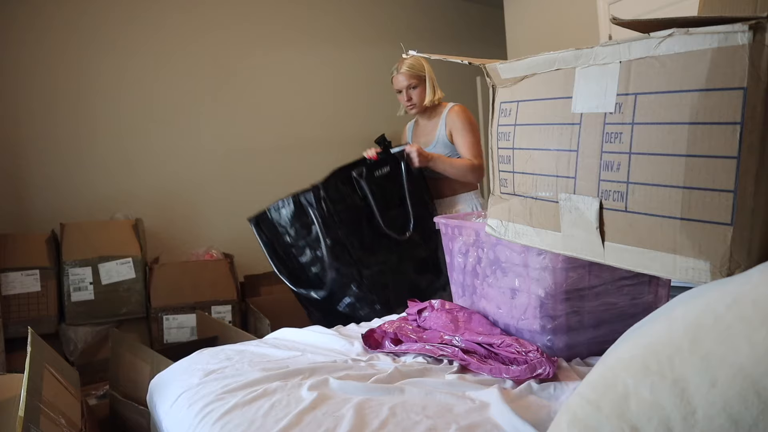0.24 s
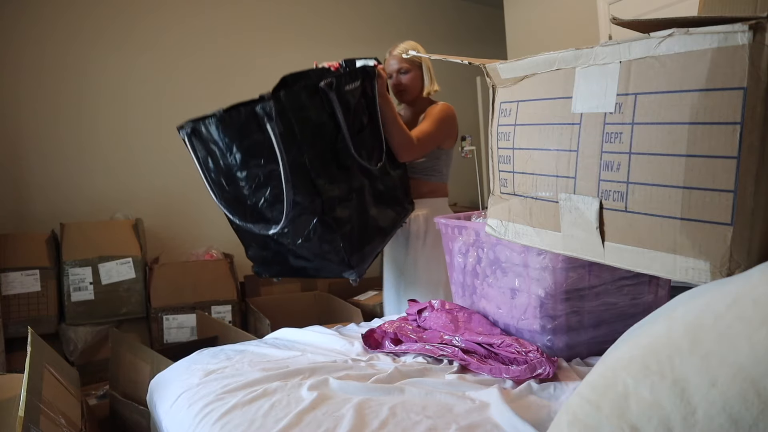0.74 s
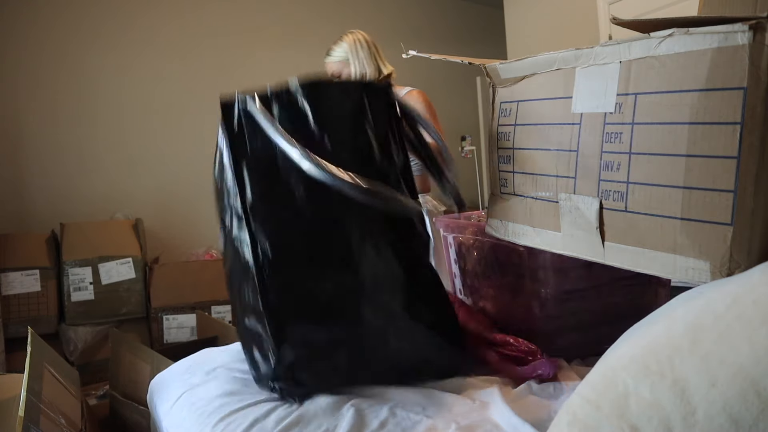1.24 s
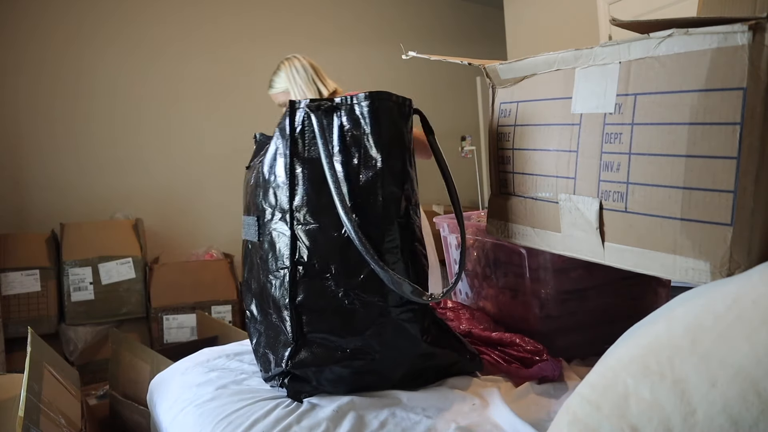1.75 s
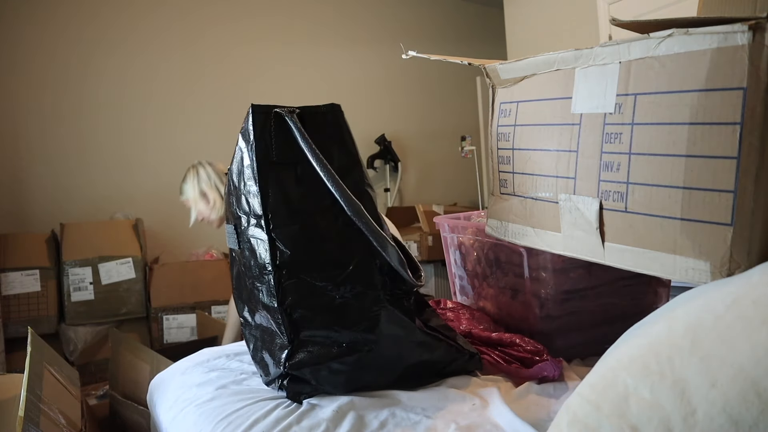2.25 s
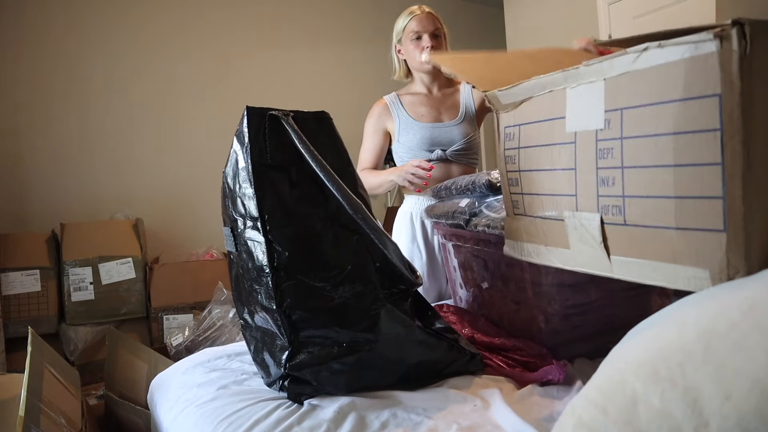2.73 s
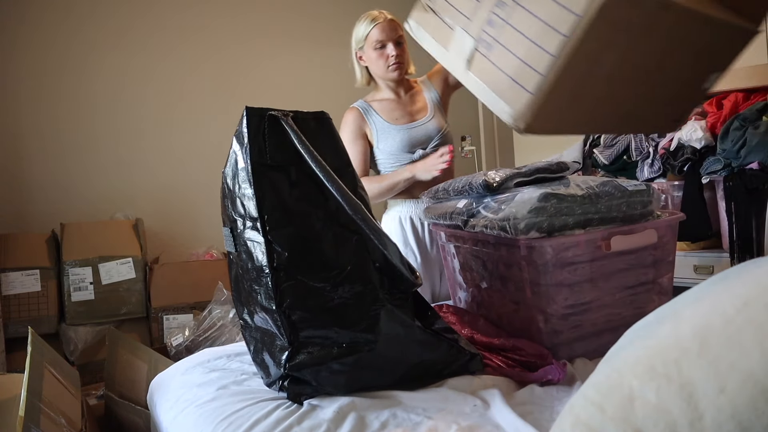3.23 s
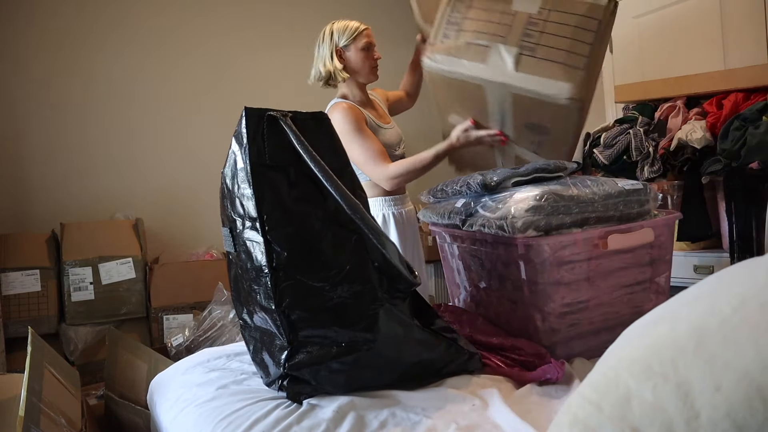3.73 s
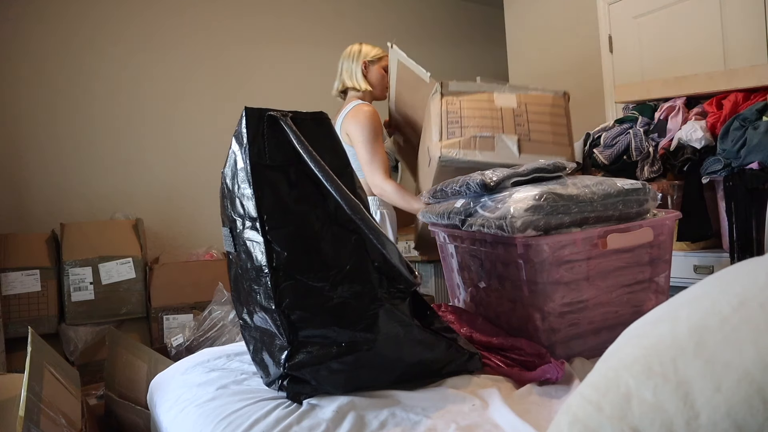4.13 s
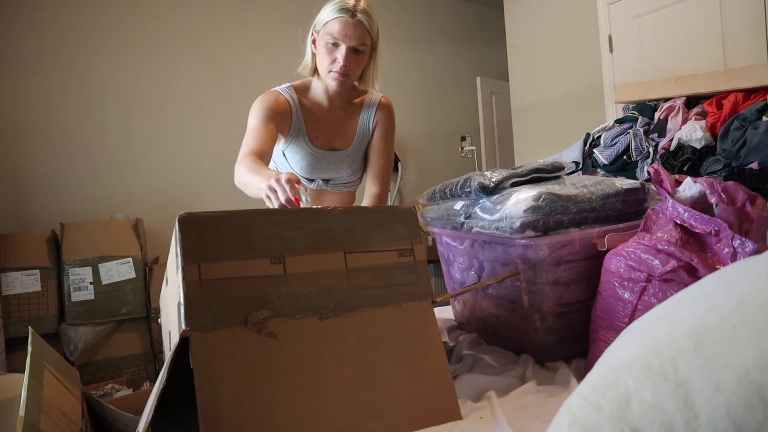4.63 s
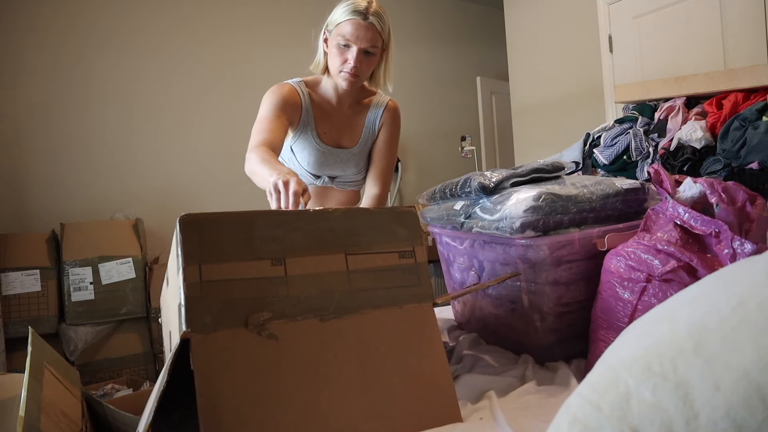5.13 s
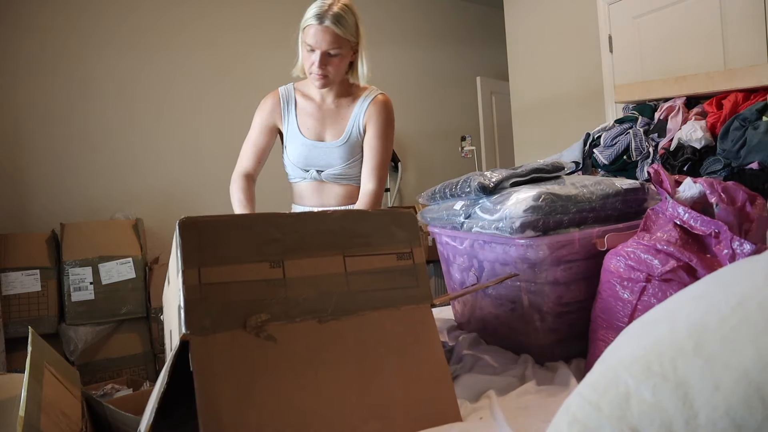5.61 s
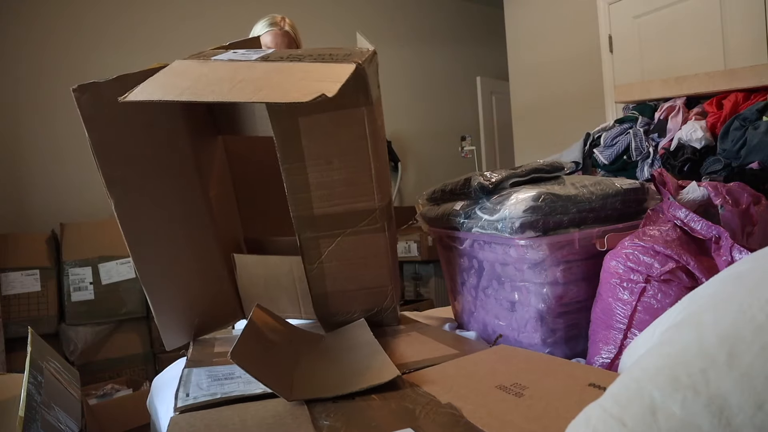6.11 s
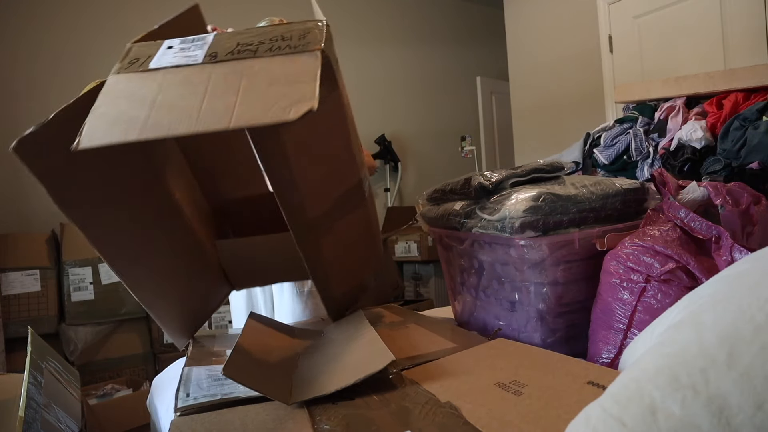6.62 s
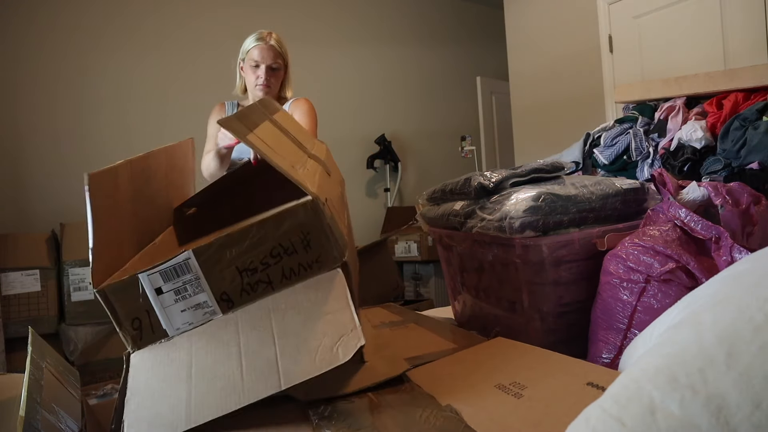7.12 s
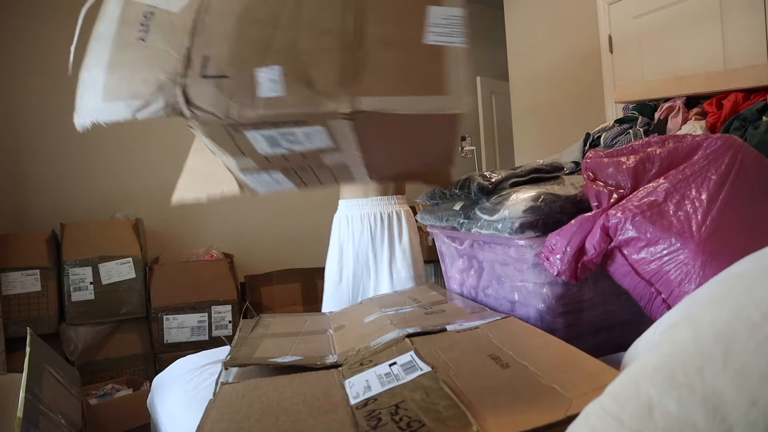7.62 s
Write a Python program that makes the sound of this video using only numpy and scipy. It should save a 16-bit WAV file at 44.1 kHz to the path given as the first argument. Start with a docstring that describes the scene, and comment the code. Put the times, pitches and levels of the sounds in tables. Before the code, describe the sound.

A stiff plastic bag crackles and thumps onto a bed, then cardboard boxes rustle, tape rips loudly, and boxes scrape, knock and get tossed indoors.

```python
"""Tidying a bedroom, heard close by in its faint hush: a stiff plastic tote bag is lifted and dumped on a bed,
then cardboard boxes are picked up, carried past, stripped of tape, slid, dropped and tossed on a pile.
Rubbing is a stream of tiny slips that rasp, ring the walls and pump the air inside. Edges scuff as gliding
resonances, folds pop and creases snap with clicks and short rings, walls thud as dying sines, boxes knock,
and tape lets go in jerks that sound sliding notes of the box. Two close microphone ports hear it all."""
import sys
import numpy as np
from scipy import signal
from scipy.fft import rfft, irfft, next_fast_len
from scipy.io import wavfile
from scipy.ndimage import uniform_filter1d, map_coordinates

SR = 44100
rng = np.random.default_rng(int(sys.argv[2]) if len(sys.argv) > 2 else 0)


def unload_audio(sound):
    """Save the sound as a 16-bit wav file, at the path given as the first command line argument."""
    columns = np.transpose(np.atleast_2d(sound))
    # keep every value between -1 and 1, then stretch to whole-number steps
    steps = np.round(np.clip(columns, -1, 1) * 32767)
    wavfile.write(sys.argv[1], SR, steps.astype(np.int16))


N = 346626
HZ = np.fft.rfftfreq(4096, 1 / SR)  # pitches at which spectra are drawn

# Rasp of each surface. Each row: frequency in Hz, relative density in dB per Hz.
BAG_RASP = [(560, -15.5), (950, -2), (1510, -3.5), (1590, -11), (1740, -1.5), (2310, -7.5), (2860, -4.5),
            (8920, -18.5), (11100, -12.5), (12200, -18), (14000, -67)]
WRAPPER_RASP = [(560, -12), (950, -7), (1350, -9.5), (1820, -4.5), (2300, -8.5), (4500, -10.5), (8340, -16),
                (11200, -14), (12700, -24), (14000, -70)]
LIFT_RASP = [(560, -4), (950, 0.5), (1410, -0.5), (2000, 1.5), (2650, -5), (11100, -18), (14000, -70)]
PEEL_RASP = [(560, -11), (950, -1.5), (1050, 0), (1380, 0), (1490, 0), (2990, -5.5), (4150, -3),
             (7050, -10), (11200, -5.5), (13100, -21), (14000, -99)]
CLOTHES_RASP = [(560, -36), (950, -4.5), (2260, -4.5), (2500, -7), (5140, -11), (11300, -9.5), (12400, -13),
                (14000, -64)]
CARRY_RASP = [(560, -14), (950, -2.5), (1250, -3), (2040, -5), (2620, -9.5), (5950, -18), (11200, -15.5),
              (13100, -29), (14000, -73)]
RIP_RASP = [(560, -8), (950, 4), (1490, -0.5), (2040, 1), (2530, -5.5), (3200, -3), (6230, -9), (10900, -4),
            (12700, -11), (13500, -48), (14000, -100)]
SLIDE_RASP = [(560, -23), (950, -16), (1090, -2.5), (1780, -2), (2680, -6.5), (3280, -8.5), (8160, -12.5),
              (11100, -9.5), (12400, -13), (14000, -58)]
DROP_RASP = [(560, -15.5), (950, -5), (1380, -1.5), (2620, -5.5), (2860, -3.5), (3430, -7.5), (7210, -11),
             (9770, -17.5), (10800, -7.5), (12200, -28), (14000, -50)]
SWING_RASP = [(560, 4), (950, 5), (1180, 1), (1390, 4), (1630, 4), (5080, 2.5), (6440, -1), (11100, 2.5),
              (12700, -5), (14000, -84)]
# Resonances of the walls. Each row: frequency in Hz, relative density in dB per Hz.
BAG_WALL = [(180, -38.5), (300, -10), (428, -4), (602, -2.5), (683, -24.5), (856, -9), (1050, -25),
            (1360, -35), (2310, -120)]
LIGHT_BOX_WALL = [(180, -38), (300, -13), (372, -6), (507, -6.5), (662, -12.5), (856, -10), (1050, -26),
                  (1360, -20), (2310, -120)]
TAPED_BOX_WALL = [(180, -38), (300, -17), (335, -4.5), (420, -10), (456, -7), (662, -8), (843, -12),
                  (1050, -22), (1360, -38), (2310, -120)]
OPEN_BOX_WALL = [(180, -44), (300, -14.5), (435, -2), (494, -5.5), (554, -3), (787, -10.5), (890, -4.5),
                 (1050, -13.5), (1360, -37), (2310, -120)]
TOSSED_BOX_WALL = [(180, -18), (300, -8), (449, 3.5), (496, 5), (673, -2.5), (860, 0), (1050, -9),
                   (1360, -6.5), (2310, -120)]
# Boom of the enclosed air. Each row: frequency in Hz, relative density in dB per Hz.
SOFT_BOOM = [(13, -20), (22, -54), (43, 3.5), (86, -6), (118, -5.5), (160, -7.5), (190, -3.5), (226, -18.5),
             (290, -13.5), (380, -35.5), (640, -120)]
PEEL_BOOM = [(13, -54), (22, -19), (48, -12), (80, -5), (107, -3), (150, -3.5), (190, -10.5), (275, -16),
             (290, -20), (380, -48), (640, -120)]
RIP_BOOM = [(13, -36), (22, 0), (65, -6), (88, 17.5), (107, 12), (145, -14), (178, 1), (217, -19), (290, 1),
            (380, -69), (640, -120)]
BOX_BOOM = [(13, -48), (22, -14), (48, -1.5), (86, -6.5), (173, 2.5), (195, -10), (226, -12), (255, -7),
            (290, -23), (380, -38), (640, -120)]
# Times in seconds of the cuts between shots, where the rubbing sound breaks off; the last is the end.
CUTS = [2.69, 4.622, 5.86, 7.39, 7.87]
# The rubs. Each row: start in seconds, attack in seconds, hold in seconds, release T60 in seconds,
# rasp level in dB, wall ring level in dB, air boom level in dB, name of the surface.
RUBS = [(0.254, 0.0086, 0.053, 1.4, -33, -33.5, -35, "bag"),
        (0.375, 0.028, 0.19, 0.84, -36, -38, -44, "bag"),
        (0.655, 0.0089, 0.17, 0.53, -35, -38.5, -41, "bag"),
        (1.012, 0.053, 0.045, 4.1, -40.5, -45.5, -43.5, "bag"),
        (1.25, 0.071, 0.036, 0.82, -25.5, -25.5, -25.5, "bag"),
        (1.432, 0.021, 0.015, 0.24, -30, -40, -24, "bag"), (1.49, 0.45, .1, 0.9, -38, -42, -42, "bag"),
        (2.125, 0.07, 0.051, 0.7, -40, -39, -41.5, "bag"),
        (2.346, 0.14, 0.19, .3, -33, -44, -55, "wrapper"),
        (2.69, 0.004, 0.27, 0.15, -45.5, -49.5, -46, "clothes"),
        (2.882, 0.08, 0.016, 1.4, -39, -41, -37.5, "lifted box"),
        (3.044, 0.045, 0.018, 0.56, -40, -40, -51, "lifted box"),
        (3.356, 0.0052, 0.019, 0.4, -48, -52.5, -52, "lifted box"),
        (3.521, 0.014, 0.03, 0.75, -34.5, -33.5, -30.5, "carried box"),
        (3.65, 0.11, 0.025, 1.2, -41, -47, -43, "carried box"),
        (3.937, 0.1, 0.036, 5.8, -49, -55, -68, "carried box"),
        (4.359, 0.1, 0.024, 0.86, -41, -40.5, -41, "lowered box"),
        (4.558, 0.033, 0.015, .3, -46.5, -52, -32, "lowered box"),
        (5.083, 0.0088, 0.31, 0.26, -27.5, -34.5, -33, "peeling tape"),
        (5.362, 0.063, 0.12, 0.54, -40.5, -33.5, -31, "peeling tape"),
        (5.538, 0.076, 0.11, 0.19, -25, -28.5, -36, "ripping tape"),
        (5.655, 0.11, 0.07, 0.17, -22, -24, -23, "ripping tape"),
        (5.855, 0.0022, 0.24, 0.79, -32.5, -38, -42, "sliding box"),
        (6.15, 0.037, 0.026, 2.8, -40.5, -38, -42.5, "sliding box"),
        (6.348, 0.031, 0.011, 0.62, -32, -27.5, -32.5, "sliding box"),
        (6.438, 0.09, 0.19, 0.43, -26.5, -27.5, -31, "sliding box"),
        (6.743, 0.045, 0.017, 0.72, -31.5, -33, -34, "sliding box"),
        (7.048, 0.033, 0.023, 0.37, -20, -32, -27, "dropped box"),
        (7.205, 0.037, 0.044, 0.4, -31, -33, -38, "dropped box"),
        (7.31, 0.033, 0.05, 0.2, -33, -34.5, -42, "dropped box"),
        (7.387, 0.0035, 0.017, 0.87, -40.5, -42, -50, "swung box"),
        (7.448, 0.087, 0.27, 1.1, -34, -57, -46.5, "swung box"),
        (7.696, 0.024, 0.025, 0.53, -28, -29, -35, "tossed box")]


def amp(db):
    """Decibels to gain."""
    return 10 ** (np.asarray(db) / 20)


def read(points, hz=HZ):
    """Joins points by straight lines on a log-frequency axis."""
    f, value = np.transpose(points)
    return np.interp(np.log(hz + 1), np.log(f + 1), value)


def add(mix, s, sound):
    """Mixes a mid-side sound in at time s."""
    part = mix[:, max(round(s * SR), 0):][:, :sound.shape[1]]
    part += sound[:, :part.shape[1]]


def evened(x, size=3000):
    """Holds the running level of the mid channel at 1."""
    power = uniform_filter1d(x[0] ** 2, size)
    return x / np.sqrt(abs(power) + 1e-20)


def response(gain):
    """Causal (minimum-phase) impulse response that has these gains."""
    log_gain = np.log(np.maximum(gain, 1e-5))
    circle = np.concatenate([log_gain, log_gain[-2:0:-1]])
    return np.fft.ifft(np.exp(np.conj(signal.hilbert(circle)))).real


def convolved(a, b):
    """Convolution along time, channel by channel."""
    return signal.fftconvolve(np.atleast_2d(a), np.atleast_2d(b), axes=1)


def room(wet_db, size=14336):
    """Mid-side response of the bedroom: direct sound at two close ports, then a tail that dies by band."""
    # Each row: frequency in Hz, T60 in seconds.
    room_t60 = [(80, 0.6), (400, 0.37), (1500, 0.32), (5000, 0.34), (12000, 0.15)]
    echoes_per_s, onset_s = 4000, 0.00036
    taps = rng.standard_normal((2, size)) * (rng.random((2, size)) < echoes_per_s / SR)
    hz, t, z = signal.stft(taps, SR, nperseg=256)
    decay = amp(-60 * t / read(room_t60, hz)[:, None])
    tail = signal.istft(z * decay, SR, nperseg=256)[1][:, :size]
    tail *= 1 - np.exp(-np.arange(size) / SR / onset_s)
    tail *= amp(wet_db) / np.linalg.norm(tail[0])
    # direct sound: the side taps put the left port ahead
    tail[:, :5] += [[0, 0, 1, 0, 0], [.7, 0, 0, 0, -.7]]
    return tail


def slips(count, per_s, spread_db):
    """Random tiny slips, a few of them much larger than the rest."""
    size = amp(spread_db * np.minimum(rng.exponential(1, count), 4))
    sign = rng.choice([-1, 1], count)
    return size * sign * (rng.random(count) < per_s / SR)


def crumpling_force(count, per_s, spread_db, crumple_db, crumple_t60):
    """One sharp impulse with a quick dying crumple of slips, at unit energy."""
    t = np.arange(count) / SR
    crumple = slips(count, per_s, spread_db) * amp(-60 * t / max(crumple_t60, .002))
    force = amp(crumple_db) * crumple / (np.linalg.norm(crumple) + 1e-9)
    force[0] += 1
    return force / np.linalg.norm(force)


def swell(t, start, attack, hold, release):
    """A rub speeds up evenly, holds, then dies away."""
    since = t - start
    rise = np.clip(since / max(attack, .001), 0, 1)
    return rise * amp(-60 * np.maximum(since - attack - hold, 0) / max(release, .02))


def hush():
    """Faint steady air of the room: filtered noise."""
    # Each row: frequency in Hz, relative density in dB per Hz.
    air_spectrum = [(13, -75), (22, -21), (48, 6), (85, -2.5), (117, -11), (158, -11), (181, -8),
                    (225, -14.5), (600, -18.5), (2620, -26.5), (6570, -36.5), (11300, -44), (12900, -43),
                    (14000, -58)]
    level_db = -49
    noise = rng.standard_normal((2, N + len(HZ)))
    air = convolved(noise, response(amp(read(air_spectrum))))[:, len(HZ):][:, :N]
    return amp(level_db) * air / air[0].std()


def resonate(x, hz, width):
    """A resonance that follows the curve hz; width in Hz."""
    turn = np.exp(2j * np.pi * np.cumsum(hz) / SR)
    r = np.exp(-np.pi * abs(width) / SR)
    return 2 * (turn * signal.lfilter([1 - r], [1, -r], x / turn)).real


def ringing(hz, width, per_s, spread_db, lead_size=8192):
    """Slips in the room, passed twice through one sliding resonance, at level 1."""
    hz = np.pad(hz, lead_size, mode="edge")
    x = convolved(slips(len(hz), per_s, spread_db), room(wet_db=0.5))[:, :len(hz)]
    x = resonate(resonate(x, hz, width), hz, width)
    return evened(x)[:, lead_size:-lead_size]


def scuffs(per_s=600, spread_db=4.0, skew=0.63):
    """An edge or a fold catches: each scuff swells quickly and fades while its pitch glides."""
    # Each row: start in seconds, length in seconds, level in dB, starting pitch in Hz,
    # glide in octaves, width of each resonance pass in Hz.
    catches = [(0.114, 0.089, -48, 1310, -0.3, 1110), (0.379, 0.043, -27.5, 1860, -0.083, 900),
               (0.407, 0.085, -30.5, 1700, 0.21, 1400), (0.561, 0.038, -26, 520, -0.31, 800),
               (1.112, 0.026, -32, 516, -0.22, 400), (1.328, 0.037, -25, 1350, -0.25, 1100),
               (1.375, 0.029, -28, 1000, 0.32, 1200), (1.921, 0.081, -34.5, 850, 0.17, 680),
               (2.137, 0.037, -33, 850, -0.7, 680), (2.221, 0.16, -41, 1020, 1, 800),
               (2.454, 0.18, -39.5, 1830, -0.08, 170), (2.59, 0.11, -40, 1850, -0.05, 420),
               (3.755, 0.056, -44, 1200, -0.19, 1010), (3.885, 0.073, -35, 1100, -0.79, 910),
               (4.443, 0.094, -34.5, 557, -0.34, 440), (5.11, 0.22, -37, 4150, -0.011, 380),
               (5.236, 0.12, -32, 870, 0.05, 200), (6.182, 0.071, -39.5, 654, 0.26, 520),
               (6.384, 0.035, -25.5, 1000, -0.056, 350), (6.576, 0.079, -28, 432, -0.15, 129.9),
               (6.571, 0.17, -29, 884, -0.11, 179), (6.836, 0.09, -26, 520, -0.27, 282),
               (6.971, 0.05, -35.5, 620, -0.33, 700), (7.714, 0.051, -33, 520, 0, 600),
               (7.714, 0.1, -25, 183, 0.002, 60)]
    mix = np.zeros((2, N))
    for s, length, db, hz, glide, width_hz in catches:
        u = np.linspace(0, 1, max(round(length * SR), 64))
        sound = ringing(hz * 2 ** (glide * u), width_hz, per_s, spread_db)
        add(mix, s, amp(db) * np.sin(np.pi * u ** skew) * sound)
    return mix


def crinkles(count=110, over_rasp_db=35.5, spread_db=3, low_hz=1000, high_hz=4000, tick_over_db=-10, wet_db=-4):
    """Small creases give way at random while the bag moves, the louder the harder it is rubbed."""
    rubs = [row[:5] for row in RUBS if row[-1] == "bag"]
    when, size, height = rng.random((count, 3)).T
    s = rubs[0][0] + when * (CUTS[0] - rubs[0][0])
    rasp = sum(amp(row[4]) * swell(s, *row[:4]) for row in rubs)
    strength = 20 * np.log10(rasp + 1e-6) + over_rasp_db + spread_db * (2 * size - 1)
    pitch = low_hz * (high_hz / low_hz) ** height
    return [(at, db, hz, tick_over_db, wet_db) for at, db, hz in zip(s, strength, pitch)]


def pops(level_db=-2.5, per_s=6000, crumple_db=-5, crumple_t60=0.016):
    """A taut fold of plastic, tape or card flips with one click, rings briefly at its own pitch and settles."""
    # Each row: start in seconds, strength in dB before level_db, pitch in Hz,
    # tick over ring in dB, room in dB.
    taut_folds = [(0.142, -9, 2100, -9, 2.5), (0.3812, 5, 1900, -21, -3), (0.3845, 5, 1800, -20, -4),
                  (0.432, 4, 4300, -6, -8), (0.656, 11, 2330, 0, -3), (0.661, 3, 3300, -2, -8),
                  (0.8108, 14, 2500, -10.5, -2.5), (0.8822, 9, 2980, -20, -4.5),
                  (1.098, 6.5, 4300, -11, -1), (1.5995, 13, 2880, -13, -6), (1.6338, 12.5, 1520, -13, -6),
                  (1.6805, 6, 2090, -5.5, 1), (1.8072, 4, 1197, -12, -7), (1.9082, 11, 900, -19, -8),
                  (2.139, 7, 951, -13, -2), (2.3325, 18, 2230, -15.5, -9), (3.5205, 14.5, 1500, -17.5, 2.5),
                  (5.0848, 8.5, 4000, -5, -5), (5.0885, 16, 2350, -4, -7), (7.7928, 13.5, 3030, -7, -7)]
    # A fold rings around its own pitch. Each row: multiple of the pitch, relative level in dB.
    fold_ring = [(0.2, -15), (0.62, -9), (0.85, -2), (1, -0.5), (1.35, -5.5)]
    mix = np.zeros((2, N))
    for s, db, hz, tick_db, wet_db in list(taut_folds) + crinkles():
        force = crumpling_force(SR // 20, per_s, 1.5, crumple_db, crumple_t60)
        colour = [(hz * multiple, ring_db) for multiple, ring_db in fold_ring]
        colour += [(2 * hz, tick_db), (11500, tick_db - 8), (14000, tick_db - 22)]
        pop = convolved(force, response(amp(read(colour) + db + level_db)))
        add(mix, s, convolved(pop, room(wet_db)))
    return mix


def flexed(x, depth, per_s=7):
    """A bending sheet slides all its resonances up and down."""
    t = np.arange(x.shape[1]) / SR
    bend = sum(np.sin(2 * np.pi * (per_s * k * t + rng.random())) for k in (.5, .8, 1.3))
    at = np.cumsum(1 + depth * bend)  # uneven reading positions
    return np.array([map_coordinates(channel, [at], order=3, mode="mirror") for channel in x])


def grip(count, uneven_db, catches_per_s=22):
    """The surfaces catch and let go unevenly, so the rub wavers in strength."""
    knots = rng.standard_normal(200)
    wander = np.interp(np.arange(count) / SR * catches_per_s, np.arange(len(knots)), knots)
    return amp(uneven_db * wander)


def rub(rows, rasp, wall, boom, per_s, spread_db, flex, uneven_db):
    """The rubs of one surface: slips rasp on it; other streams of slips ring the walls and pump the air inside."""
    start = rows[0][0]
    next_cut = min(cut for cut in CUTS if cut > start + .1)
    stop = min(max(sum(row[:4]) for row in rows), next_cut)
    t = np.arange(start, stop, 1 / SR)
    levels = np.sqrt(sum(np.outer(amp(row[4:]), swell(t, *row[:4])) ** 2 for row in rows))
    lead, space = SR // 4, room(wet_db=4.5)
    # spectrum, slips per s, flex depth
    layers = [(rasp, per_s, flex), (wall, 450, .035), (boom, 700, .04)]
    sound = np.zeros((2, len(t)))
    for level, (spectrum, rate, depth) in zip(levels, layers):
        stream = slips(2 * lead + len(t), rate, spread_db)
        grains = convolved(stream, convolved(response(amp(read(spectrum))), space))
        grains = flexed(grains[:, lead:2 * lead + len(t)], depth)[:, :len(t)]
        sound += evened(grains) * level
    fade = np.clip((stop - t) / 0.0021, 0, 1)
    return start, sound * grip(len(t), uneven_db) * fade


def rubbing():
    """Every rub with its surface, its walls and its grain."""
    # What rubs, by name: rasp, wall, boom, slips per second, spread of their sizes in dB,
    # depth of each flexing swing on the rasp as a share, unevenness of the grip in dB.
    surfaces = {"bag": (BAG_RASP, BAG_WALL, SOFT_BOOM, 300, 2.8, 0.025, 1.9),
                "wrapper": (WRAPPER_RASP, LIGHT_BOX_WALL, SOFT_BOOM, 2000, 4.5, 0.0097, 1.4),
                "clothes": (CLOTHES_RASP, LIGHT_BOX_WALL, SOFT_BOOM, 7400, 2.2, 0.0118, 2.2),
                "lifted box": (LIFT_RASP, LIGHT_BOX_WALL, SOFT_BOOM, 3400, 5.3, 0.0152, 1.7),
                "carried box": (CARRY_RASP, LIGHT_BOX_WALL, SOFT_BOOM, 3000, 3.1, 0.0153, 1.5),
                "lowered box": (CLOTHES_RASP, TOSSED_BOX_WALL, SOFT_BOOM, 3100, 2.6, 0.0146, 1.9),
                "peeling tape": (PEEL_RASP, TAPED_BOX_WALL, PEEL_BOOM, 1100, 2.8, 0.0152, 0.7),
                "ripping tape": (RIP_RASP, TAPED_BOX_WALL, RIP_BOOM, 1000, 3, 0.0198, 1.1),
                "sliding box": (SLIDE_RASP, OPEN_BOX_WALL, BOX_BOOM, 1100, 3.1, 0.0206, 1.82),
                "dropped box": (DROP_RASP, TOSSED_BOX_WALL, BOX_BOOM, 1300, 1.2, 0.0143, 3.5),
                "swung box": (SWING_RASP, TOSSED_BOX_WALL, BOX_BOOM, 5900, 0.56, 0.0143, 2.7),
                "tossed box": (DROP_RASP, LIGHT_BOX_WALL, BOX_BOOM, 1400, 1.2, 0.0148, 1.26)}
    mix = np.zeros((2, N))
    for name, surface in surfaces.items():
        rows = [row[:-1] for row in RUBS if row[-1] == name]
        add(mix, *rub(rows, *surface))
    return mix


def blows(rows, per_s, level_db, crumple_db, crumple_t60, crack_db, crack_db_per_octave, ring_peak_db, bass_db,
          top_db, wet_db):
    """Each blow is one sharp crack and a quick crumple; a smaller patch of wall rings higher and cracks harder."""
    damped_hz = 1630  # patches pitched above this hardly ring
    mix = np.zeros((2, N))
    for s, ring, hz, tick_over_db in rows:
        crack = ring + crack_db + crack_db_per_octave * np.log2(hz / 1000)
        tick = crack + tick_over_db
        force = crumpling_force(SR // 12, per_s, 4.0, crumple_db, crumple_t60)
        colour_db = read([(30, ring - 16), (170, ring + bass_db), (260, ring - 10), (400, ring - 1),
                          (850, ring - 2), (1200, crack), (2700, crack - 2), (4500, tick + 2),
                          (8500, tick - 3 + top_db), (11500, tick - 1 + top_db), (14000, tick - 14 + 2 * top_db)])
        peak = np.exp(-(np.log((HZ + 1) / hz) / 0.15) ** 2)
        colour_db += ring_peak_db / (1 + (hz / damped_hz) ** 2) * peak
        blow = convolved(force, response(amp(colour_db + level_db)))
        add(mix, s, convolved(blow, room(wet_db)))
    return mix


def crease_snaps():
    """The larger creases of the bag snap: a crack, a crumple and a ring of the patch."""
    # Each row: start in seconds, strength in dB before level_db, pitch in Hz, tick over crack in dB.
    creases = [(0.3805, 12, 1830, -9), (0.43, 6.5, 2100, -13), (0.5055, 10, 1660, -13),
               (0.5794, 11, 900, -8), (0.6552, 18.5, 1690, -10), (0.7134, 17, 780, -28),
               (0.7694, 2, 2030, -1), (1.047, 0.5, 3395, -7.5), (1.2326, 5, 2598, -3.5),
               (1.3194, 17, 1400, -17), (1.3792, 19, 474, -5), (1.4571, 19.5, 427, -16),
               (1.5993, 11, 1030, -7), (1.7275, 16, 460, -8), (1.8073, 11.5, 860, -9.5),
               (1.879, 6.5, 1480, -8), (1.9084, 15.5, 460, -26), (1.989, 6, 1427, -28), (2.03, 12, 453, -7),
               (2.108, -4, 3100, -3), (2.1375, 8.5, 834, -8), (2.2434, 6.5, 500, -2),
               (2.27, 10.5, 446, -20), (2.4174, -1, 1400, -1)]
    return blows(creases, per_s=1600, level_db=-1.5, crumple_db=6.5, crumple_t60=0.045, crack_db=-7.5,
                 crack_db_per_octave=4.5, ring_peak_db=6.0, bass_db=-3, top_db=-7.0, wet_db=1.0)


def thuds(level_db=-4, rise_s=0.00037, t60=0.16, at_hz=100, damping=0.96, wet_db=-8):
    """A bump swings a bag or box wall to and fro for a few cycles; the higher its pitch, the sooner it stops."""
    # Each row: start in seconds, level in dB before level_db, pitch in Hz.
    bumps = [(0.383, -13.5, 540), (0.576, -24, 132.3), (0.58, -12, 426), (0.659, -20.5, 167),
             (1.315, -10, 92.6), (1.333, -16, 139), (1.35, -25, 61.9), (1.366, -15.5, 237),
             (1.452, -17, 188.6), (1.45, -6.5, 437), (1.46, -9.5, 89), (1.608, -18, 145.5),
             (1.807, -24, 76.1), (2.177, -29, 63.6), (2.335, -18.5, 440), (2.418, -18, 450),
             (2.986, -23, 62), (3.02, -25, 62), (3.527, -17.5, 46.7), (3.533, -22, 190), (3.548, -21, 109),
             (3.577, -30, 199), (3.789, -28, 115), (3.812, -24.5, 210), (3.844, -31, 134), (4.565, -31, 47),
             (4.762, -25.5, 596), (4.769, -31, 148), (4.891, -41, 149), (5.094, -21, 157), (5.597, -6, 106),
             (5.726, -15, 104), (5.759, -6.5, 117), (5.778, -15, 125), (6.314, -15, 160), (6.335, -16, 173),
             (6.381, -9.5, 450), (6.39, -10, 555), (6.484, -19, 147), (6.619, -18, 128), (6.796, -23, 123),
             (7.051, -7, 610), (7.054, -16.5, 136), (7.061, -13, 64.9), (7.083, -11, 79), (7.094, -9, 501),
             (7.126, -18, 238), (7.131, -16, 336), (7.335, -25, 58), (7.355, -26, 133), (7.716, -19, 187),
             (7.751, -10, 540), (7.797, -13, 135), (7.81, -18, 44), (7.811, -3.5, 477), (7.814, -14, 250),
             (7.835, -13, 348)]
    mix, t = np.zeros((2, N)), np.arange(SR // 2) / SR
    for s, db, hz in bumps:
        decay = amp(-60 * t / t60 * (hz / at_hz) ** damping)
        swing = np.sin(2 * np.pi * hz * t) * (1 - np.exp(-t / rise_s)) * decay
        add(mix, s, amp(db + level_db) * convolved(swing, room(wet_db)))
    return mix


def cardboard_knocks():
    """Cardboard knocks: a crack and a heavy short crumple over a strong ring of the wall."""
    # Each row: start in seconds, strength in dB before level_db, pitch in Hz, tick over crack in dB.
    knocks = [(3.5205, 19, 1320, -34), (3.529, 12, 1600, -29), (3.564, 8, 1300, -18), (4.0003, 0, 1694, -6),
              (5.0873, 1.5, 2300, -4), (6.3805, 12, 416, -5), (7.0512, 16, 614, -8.5),
              (7.096, 19.5, 1490, -16), (7.1294, 19.5, 1350, -24), (7.7928, 16.5, 900, -17),
              (7.8105, 13.5, 516, -24)]
    return blows(knocks, per_s=4000, level_db=-3.0, crumple_db=10.0, crumple_t60=0.025, crack_db=-7.0,
                 crack_db_per_octave=3.0, ring_peak_db=12.5, bass_db=-2.0, top_db=7.0, wet_db=3.0)


def tape_picks():
    """Fingers pick at the end of the tape, close by: small cracks with less room on them."""
    # Each row: start in seconds, strength in dB before level_db, pitch in Hz, tick over crack in dB.
    picks = [(4.7615, 0.5, 620, -14), (4.7715, -8.5, 900, -11), (4.8845, 0.5, 1000, -11),
             (4.8875, -19, 1900, -7), (4.9764, -23.5, 2200, 6), (5.0235, -19, 2230, 3.5),
             (5.049, -29, 2200, 2), (5.078, -17, 2200, -3)]
    return blows(picks, per_s=13000, level_db=-1.5, crumple_db=-2.0, crumple_t60=0.02, crack_db=-7,
                 crack_db_per_octave=12.5, ring_peak_db=2.5, bass_db=2, top_db=-2.5, wet_db=-2.0)


def pulled(curve, level_db, width_hz, per_s=900, spread_db=2.0, fade_s=0.0033):
    """The tape lets go in small jerks that keep one note of the box sounding."""
    s, hz, db = np.transpose(curve)
    t, mix = np.arange(s[0], s[-1], 1 / SR), np.zeros((2, N))
    fade = np.clip(np.minimum(t - t[0], t[-1] - t) / fade_s, 0, 1)
    note = ringing(np.interp(t, s, hz), width_hz, per_s, spread_db)
    add(mix, s[0], fade * amp(np.interp(t, s, db) + level_db) * note)
    return mix


def taped_box():
    """The pull of the tape bends the box, so the note of its wall and the hum of its air slide."""
    # Each row: time in seconds, pitch in Hz, level in dB before level_db.
    wall_note = [(5.09, 483, -26), (5.13, 504, -41), (5.236, 617, -28), (5.398, 460, -45),
                 (5.498, 375, -28.5), (5.538, 438, -39), (5.59, 475, -24.5), (5.758, 516, -33.5),
                 (5.814, 540, -22), (5.85, 493, -22)]
    air_note = [(5.09, 172, -45), (5.19, 192, -30.5), (5.248, 173, -34.5), (5.468, 179, -31),
                (5.512, 183, -25.5), (5.548, 183, -40), (5.604, 160, -42), (5.732, 174, -21.5),
                (5.816, 160, -35), (5.85, 172, -26)]
    wall = pulled(wall_note, level_db=-1.0, width_hz=65)
    air = pulled(air_note, level_db=0.5, width_hz=23.0)
    return wall + air


def ports(mid, side):
    """The two microphone ports agree in the bass and oppose each other in the treble."""
    # Each row: frequency in Hz, gain of the side channel in dB.
    width = [(60, -100), (110, -68), (200, -8), (380, -14), (700, -5), (1290, -1), (2380, 2), (4400, 3),
             (8120, 4.5), (15000, 13)]
    # The box is carried past on the right, so the right port hears it first: from, to in seconds.
    on_the_right = (2.7, 3.98)
    lean_db, lean_hz = -18.5, 400  # above this pitch a little of the mid leans to the left port
    t, size = np.arange(N) / SR, next_fast_len(N)
    hz = np.fft.rfftfreq(size, 1 / SR)
    side = np.where((t > on_the_right[0]) & (t < on_the_right[1]), -side, side)
    lean = amp(lean_db) * hz ** 2 / (hz ** 2 + lean_hz ** 2)
    side = irfft(rfft(side, size) * amp(read(width, hz)) + rfft(mid, size) * lean, size)[:N]
    return np.array([mid + side, mid - side])


def scene():
    """Sums the sources at the two microphone ports."""
    bag_and_boxes = scuffs() + pops() + rubbing() + crease_snaps() + thuds() + cardboard_knocks()
    tape = tape_picks() + taped_box()
    mid, side = hush() + bag_and_boxes + tape
    return ports(mid, side)


def record(dry):
    """The recorder rounds off the highest peaks, then limits the band."""
    ceiling, edge_hz = .8, 14300
    rounded = dry / (1 + (dry / ceiling) ** 6) ** (1 / 6)
    lowpass = signal.firwin(255, edge_hz, window=("kaiser", 9), fs=SR)
    return signal.oaconvolve(rounded, lowpass[None], "same")


dry = scene()
out = record(dry)
unload_audio(out)
```